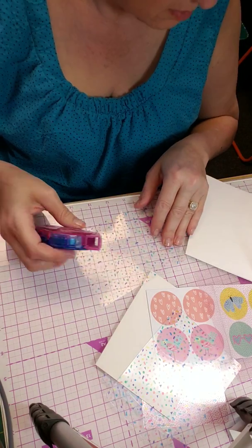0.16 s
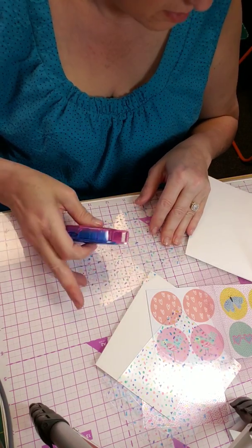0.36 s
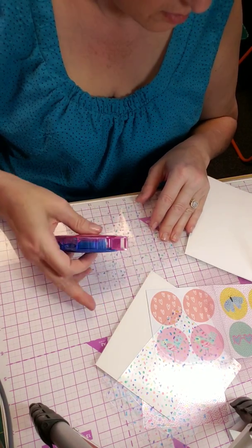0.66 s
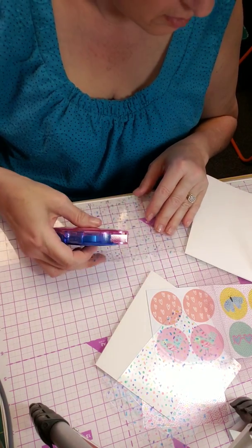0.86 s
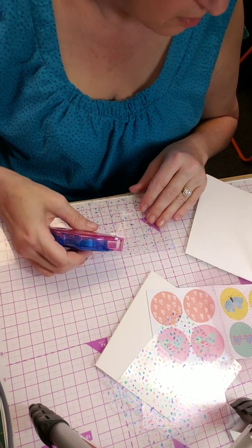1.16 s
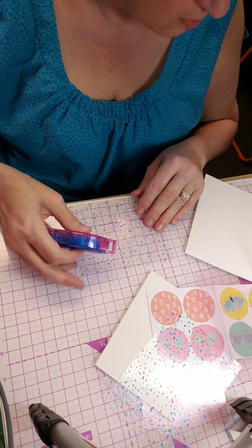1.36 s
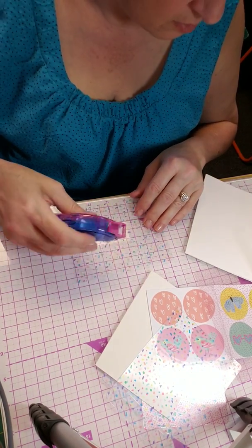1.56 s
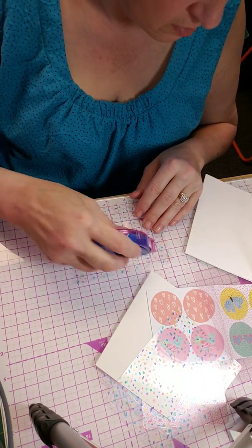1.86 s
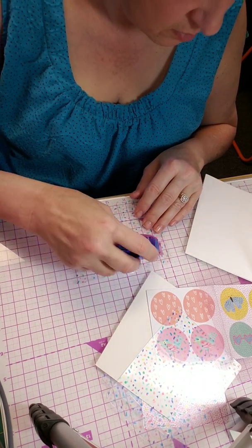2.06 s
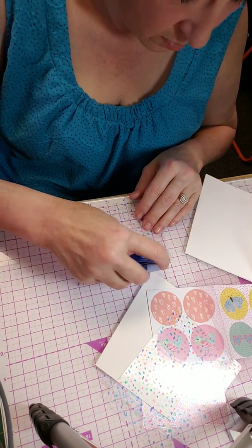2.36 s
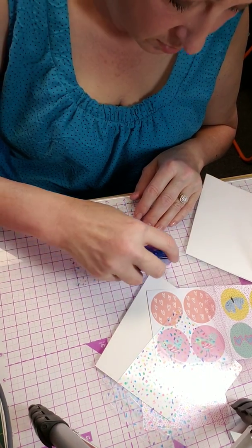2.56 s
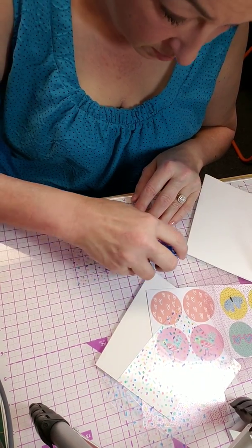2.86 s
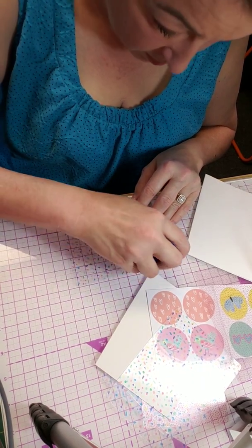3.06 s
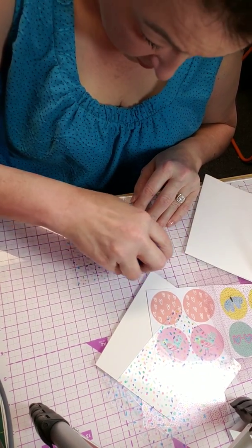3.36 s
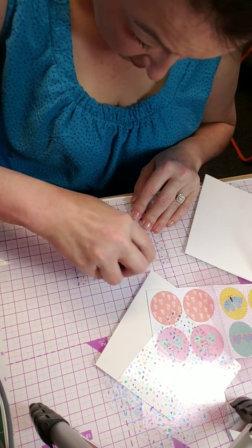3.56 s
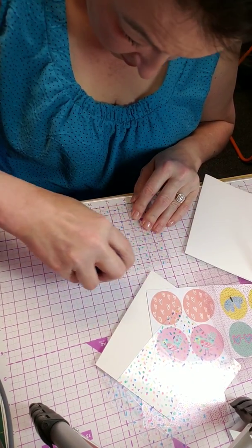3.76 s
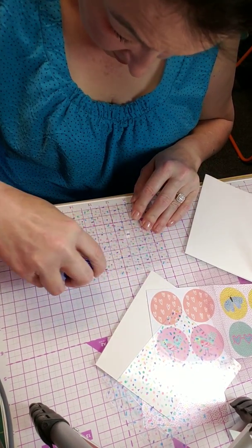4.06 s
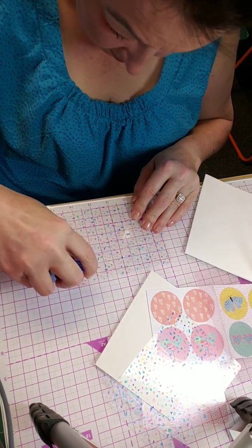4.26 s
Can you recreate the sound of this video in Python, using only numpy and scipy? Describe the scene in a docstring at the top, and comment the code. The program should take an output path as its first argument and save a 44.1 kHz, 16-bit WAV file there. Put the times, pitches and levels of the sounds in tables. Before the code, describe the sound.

After light plastic handling and one sharp click, a tape runner lands on card and rattles along briefly in a small, dry room.

```python
"""A plastic tape runner is drawn for a second: a pawl rattles over the spool's ratchet, the gears whirr,
and each jolt rings the case and knocks through card into the table. Before the stroke, the runner is
turned in the hand over a craft mat, clicks once, is set down on the card and creaks under the hand.
Fingers brush, tick and squeak on plastic and mat; a small, dry room rumbles underneath."""
import sys
import numpy as np
from scipy import signal
from scipy.fft import rfft, irfft
from scipy.io import wavfile
from scipy.ndimage import uniform_filter1d

SR = 44100
rng = np.random.default_rng(int(sys.argv[2]) if len(sys.argv) > 2 else 0)


def master(y):
    """Save y as 16-bit WAV."""
    cut = np.clip(np.atleast_2d(y).T, -1, 1)
    pcm = np.round(cut * 32767)  # scale
    wavfile.write(sys.argv[1], SR, pcm.astype(np.int16))


N = 194428


def amp(db):
    """Decibels to gain."""
    return 10 ** (np.asarray(db) / 20)


def unit_rms(x):
    """Scales to an rms of one."""
    return x / np.sqrt(np.mean(x ** 2) + 1e-20)


def curve_at(points, hz):
    """Interpolates a table on a log-frequency axis."""
    f, value = np.transpose(points)
    return np.interp(np.log(hz + 1), np.log(f + 1), value)


def add(mix, start_s, sound):
    """Adds a stereo sound to the mix."""
    part = mix[:, round(start_s * SR):][:, :sound.shape[1]]
    part += sound[:, :part.shape[1]]


def coloured(x, spectrum, size=8192):
    """Minimum-phase filter of unit energy with the given spectrum."""
    log_gain = np.log(amp(curve_at(spectrum, abs(np.fft.fftfreq(size, 1 / SR)))))
    taps = np.fft.ifft(np.exp(np.conj(signal.hilbert(log_gain)))).real[:size // 2]
    return signal.oaconvolve(x, taps[None] / np.linalg.norm(taps), axes=1)[:, :N]


def noise(size=N):
    """Stereo white noise."""
    return rng.standard_normal((2, size))


def flicker(depth_db, grain_samples):
    """Random gain with an rms swing of depth_db."""
    return amp(depth_db * unit_rms(uniform_filter1d(rng.standard_normal(N), size=grain_samples)))


def unit_blow(x):
    """Scales to the energy of 4 ms at full level."""
    return x * np.sqrt(0.004 * SR / np.sum(x ** 2, axis=1, keepdims=True))


def burst(grain, crack_t60_s, ring_t60_s, ring_db, rise_s=0.00039):
    """Hard contact: a brief crack, then crowded modes decaying."""
    t = np.arange(grain.shape[1]) / SR
    decay = amp(-60 * t / crack_t60_s) + amp(ring_db - 60 * t / ring_t60_s)
    return unit_blow(grain * (1 - np.exp(-t / rise_s)) * decay)


def ring(modes, rise_s, tilt_db_per_oct=0, scatter_db=2, size=8000):
    """Damped modes; each blow shares its energy among them differently."""
    t = np.arange(size) / SR
    hz, db, t60_s = np.transpose(modes)[:, :, None]
    level_db = db + tilt_db_per_oct * np.log2(hz / hz[0])
    level_db = level_db + scatter_db * rng.standard_normal((2, len(modes), 1))
    waves = np.sin(2 * np.pi * (hz * t + rng.random((2, len(modes), 1))))
    attack = (1 - np.exp(-t / rise_s)) ** 2
    return unit_blow((amp(level_db - 60 * t / t60_s) * waves).sum(1) * attack)


def contacts(rows, spectrum, crack_t60_s, ring_t60_s, ring_db):
    """Hard contacts sharing one spectrum."""
    out = np.zeros((2, N))
    for start_s, db in rows:
        add(out, start_s, amp(db) * burst(noise(4000), crack_t60_s, ring_t60_s, ring_db))
    return coloured(out, spectrum)


def slide(strokes, spectrum, half_width_hz, broad_db, narrow_db, grain_db):
    """Sliding skin: swells of grainy hiss with a resonance set by the contact."""
    t, out = np.arange(N) / SR, np.zeros((2, N))
    broad = unit_rms(coloured(noise() * flicker(grain_db, grain_samples=150), spectrum))
    radius = np.exp(-2 * np.pi * half_width_hz / SR)
    for middle_s, half_length_s, db, hz in strokes:
        pole = radius * np.exp(2j * np.pi * hz / SR)
        narrow = unit_rms(signal.lfilter([1], np.poly([pole, pole]), broad).real)
        swell = np.exp(-abs((t - middle_s) / half_length_s) ** 1.84)  # 1 is pointed, 2 rounded
        out += amp(db) * swell * (amp(broad_db) * broad + amp(narrow_db) * narrow)
    return out


# Rumble and hiss spectra. Each row: frequency in Hz, relative density in dB.
RUMBLE_SPECTRUM = [(18, -33.5), (42, -12), (54, 0.5), (75, -5), (115, -4.5), (140, -15.5), (250, -19.5),
                   (330, -34), (480, -41), (900, -60.5), (3000, -71)]
HISS_SPECTRUM = [(300, 0.5), (1500, -0.5), (4000, 1), (7000, 3), (9000, -2.5), (13000, 1.5), (15300, 2),
                 (15700, -27)]

def background(rumble_db=-58, hiss_db=-74):
    """Low house rumble and even microphone hiss."""
    rumble = amp(rumble_db) * unit_rms(coloured(noise(), RUMBLE_SPECTRUM))
    return rumble + amp(hiss_db) * unit_rms(coloured(noise(), HISS_SPECTRUM))


# Finger strokes. Each row: middle in seconds, half length in seconds, level in dB, resonance in Hz.
RUBS = [(0.0, 0.06, -70.5, 6500), (0.26, 0.068, -75, 4100), (0.589, 0.015, -59.5, 4550),
        (0.68, 0.06, -69, 4850), (0.765, 0.098, -67.5, 4430), (0.92, 0.047, -63.5, 4270),
        (1.03, 0.057, -71, 4460), (1.15, 0.024, -64, 5400), (1.32, 0.049, -59.5, 4600),
        (1.388, 0.0057, -57, 3670)]
# Skin friction. Each row: frequency in Hz, relative density in dB.
RUB_SPECTRUM = [(1000, -26), (2400, -14), (3300, -5.5), (4500, -2), (5700, -11), (7200, 1.5), (9000, -14),
                (15000, -15)]

def finger_rubs():
    """Skin brushes over plastic and mat: a broad hiss."""
    return slide(RUBS, RUB_SPECTRUM, half_width_hz=1250, broad_db=-3.5, narrow_db=-4, grain_db=2.5)


# Finger contacts. Each row: start in seconds, level in dB.
TICKS = [(0.103, -57.5), (0.233, -67), (0.259, -63), (0.552, -61), (0.5735, -50.5), (0.5855, -49.5),
         (0.6085, -52.5), (0.7135, -50.5), (0.8935, -63), (1.3907, -49)]
# Tick spectrum. Each row: frequency in Hz, relative density in dB.
TICK_SPECTRUM = [(500, -28), (2700, -23), (3550, 1.5), (4150, -3), (5000, 6), (6000, -4), (7500, -6.5),
                 (9500, -13.5), (15000, -13.5)]

def finger_ticks(gain_db=-1):
    """Fingers tap lightly on plastic."""
    return amp(gain_db) * contacts(TICKS, TICK_SPECTRUM, crack_t60_s=0.012, ring_t60_s=0.047, ring_db=-5)


# Contacts within the click. Each row: start in seconds, level in dB.
CLICK_HITS = [(0.9281, -39), (0.9297, -54)]
# Click spectrum. Each row: frequency in Hz, relative density in dB.
CLICK_SPECTRUM = [(300, -35), (650, -5), (950, -13.5), (1200, -3), (1600, -9), (2100, 1), (3200, -4.5),
                  (4600, -2), (6400, -6), (9500, -17), (12300, -21), (15700, -29)]

def grip_click():
    """One sharp click as the grip closes."""
    return contacts(CLICK_HITS, CLICK_SPECTRUM, crack_t60_s=0.0046, ring_t60_s=0.094, ring_db=-22)


# Fingertip catch. Each row: middle in seconds, half length in seconds, level in dB, resonance in Hz.
SQUEAK = [(2.361, 0.016, -52.5, 5190)]
# Squeak spectrum. Each row: frequency in Hz, relative density in dB.
SQUEAK_SPECTRUM = [(2000, -29), (4500, -12), (5100, -8), (6300, 4.5), (6800, -10), (7400, -1), (8200, -19),
                   (15000, -16)]

def finger_squeak():
    """A fingertip catches: brief friction with a narrow resonance."""
    return slide(SQUEAK, SQUEAK_SPECTRUM, half_width_hz=230, broad_db=-4.5, narrow_db=-5, grain_db=3.5)


# Tip contacts on card. Each row: start in seconds, level in dB.
LANDING_HITS = [(2.8489, -38), (2.851, -37), (2.864, -42), (2.875, -52.5)]
# Landing spectrum. Each row: frequency in Hz, relative density in dB.
LANDING_SPECTRUM = [(120, -9), (260, -2), (390, -6.5), (560, -20), (730, -4.5), (880, -8), (1200, -4),
                    (1500, 1.5), (1900, -15.5), (3000, -3), (4200, -9), (7500, -10.5), (10500, -20),
                    (15200, -18)]
# Tabletop modes. Each row: frequency in Hz, relative level in dB, T60 in seconds.
TABLE_MODES = [(91, -1, 0.13), (159, 2, 0.082), (276, -2.5, 0.085), (379, -3, 0.061), (730, -28, 0.06),
               (1025, -13.5, 0.18), (1570, -9, 0.088)]

def landing(thump_db=-41.5):
    """The runner's tip lands and settles; the first contact rings the table."""
    out = contacts(LANDING_HITS, LANDING_SPECTRUM, crack_t60_s=0.012, ring_t60_s=0.067, ring_db=-10)
    add(out, LANDING_HITS[0][0], amp(thump_db) * ring(TABLE_MODES, rise_s=0.0039, scatter_db=2.5))
    return out


# Plastic case radiation. Each row: frequency in Hz, relative density in dB.
CASE_SPECTRUM = [(300, -25.5), (520, -32.5), (900, -14.5), (1250, -1), (1550, 2), (1750, -5), (2400, -4),
                 (3000, 3.5), (4600, 4.5), (5800, 0.5), (7400, -1.5), (8700, -9), (13500, -2), (15700, -8)]
# Case modes. Each row: frequency in Hz, relative level in dB, T60 in seconds.
CASE_MODES = [(743.6, -16, 0.039), (1247, 5, 0.016), (1499, 3, 0.029), (1588, -5, 0.051), (1986, -11, 0.08),
              (2890, -8.5, 0.077), (3200, -8, 0.039), (3380, 2.5, 0.023), (4000, -7, .03), (4640, 3, 0.019),
              (7510, 1.5, 0.021)]
# Runs of slips. Each row: start in seconds, length in seconds, level in dB, tilt in dB per octave.
CREAKS = [(2.936, 0.04, -59, -39), (3.039, 0.14, -64, -14.5), (3.116, 0.01, -56, -4.5),
          (3.327, 0.12, -59.5, -37), (4.355, 0.06, -72, -6)]

def case_creaks(gap_s=0.025, jitter=0.55, max_slips=12, swell_db_per_s=44.5, scrape_db=-7):
    """Small slips of the loaded case ring its modes, growing as the load builds."""
    rings, scrapes = np.zeros((2, 2, N))
    for start_s, length_s, db, run_tilt in CREAKS:
        gaps_s = gap_s * (1 + jitter * (rng.random(max_slips) - 0.5))
        for delay_s in np.cumsum(gaps_s) - gaps_s[0]:
            tilt = run_tilt + 6.5 * rng.standard_normal()
            tone = ring(CASE_MODES, rise_s=0.002, tilt_db_per_oct=tilt, scatter_db=4, size=4000)
            scrape = burst(noise(2000), crack_t60_s=0.0069, ring_t60_s=0.036, ring_db=-3)
            if delay_s < length_s:
                strength = amp(db + swell_db_per_s * delay_s)
                add(rings, start_s + delay_s, strength * tone)
                add(scrapes, start_s + delay_s, strength * amp(scrape_db) * scrape)
    return rings + coloured(scrapes, CASE_SPECTRUM)


# Stroke speed, with surges and snags. Each row: time in seconds, ratchet teeth per second.
STROKE_SPEED = [(3.177, 23.4), (3.22, 38.7), (3.375, 63.6), (3.417, 41.7), (3.479, 68.7), (3.496, 53.9),
                (3.6, 72.2), (3.62, 58.0), (3.691, 74.2), (3.715, 44.2), (3.801, 66.2), (3.806, 39.4),
                (3.887, 60.0), (3.94, 37.1), (3.944, 56.1), (4.165, 37.4)]

def travel(stop_s=4.175):
    """The stroke per sample: time, speed and ratchet teeth passed."""
    t = np.arange(N) / SR
    knots_s, rates = np.transpose(STROKE_SPEED)
    teeth_per_s = np.interp(t, knots_s, rates) * (t >= knots_s[0]) * (t < stop_s)
    return t, teeth_per_s, np.cumsum(teeth_per_s) / SR


# Hand pressure. Each row: time in seconds, tooth level in dB, relative treble in dB.
PRESSURE = [(3.18, -32.5, -4.5), (3.24, -28.5, -6), (3.41, -29.5, -7.5), (3.52, -28.5, -5.5),
            (3.635, -29.5, -10.5), (3.66, -27.5, -3), (3.75, -28, -7.5), (3.93, -32, -6), (4.06, -31, -1),
            (4.165, -31, -7.5)]

def pawl_drops(teeth_per_turn=15, tightest_tooth=3, bite_db=0.12, bite_treble_db=0.5, scatter_db=1.4):
    """One drop per tooth, columns as in PRESSURE; the pawl bites harder and brighter once per turn."""
    t, _, teeth = travel()
    starts_s = t[1:][np.diff(np.ceil(teeth)) > 0]
    knots_s, press_db, press_treble_db = np.transpose(PRESSURE)
    bite = np.cos(2 * np.pi * (np.arange(len(starts_s)) - tightest_tooth) / teeth_per_turn)
    level_db = np.interp(starts_s, knots_s, press_db) + bite_db * bite
    level_db += scatter_db * rng.standard_normal(len(starts_s))
    treble_db = np.interp(starts_s, knots_s, press_treble_db) + bite_treble_db * bite
    return np.transpose([starts_s, level_db, treble_db])


def ratchet(drops, likeness=0.55, split_hz=8700, top_db=3, modes_db=-9,
            ping_db=-6, lowest_ping_hz=2887, ping_octaves=0.7, tip_db=-3, tip_hz=13400, size=2000):
    """Each drop rings the case, the pawl and its thin tip, much like the last; the treble dies first."""
    strikes, rings = np.zeros((2, 2, N))
    lowpass = signal.butter(4, split_hz, "low", fs=SR, output="sos")
    highpass = signal.butter(4, split_hz, "high", fs=SR, output="sos")
    grain = noise(size)
    mean_treble_db = np.mean(drops[:, 2])
    for start_s, db, treble_db in drops:
        grain = likeness * grain + np.sqrt(1 - likeness ** 2) * noise(size)
        body = burst(grain, crack_t60_s=0.023, ring_t60_s=0.042, ring_db=23, rise_s=0.00022)
        top = burst(grain, crack_t60_s=0.00142, ring_t60_s=0.025, ring_db=2, rise_s=0.00031)
        sharpness = amp(top_db + treble_db - mean_treble_db)
        strike = signal.sosfilt(lowpass, body) + sharpness * signal.sosfilt(highpass, top)
        add(strikes, start_s, amp(db) * strike)
        add(rings, start_s, amp(db + modes_db) * ring(CASE_MODES, rise_s=0.00065, scatter_db=1))
        ping_hz = lowest_ping_hz * 2 ** (ping_octaves * rng.random() ** 1.546)  # skewed low
        ping = ring([(ping_hz, 0, 0.028)], rise_s=0.00011, size=size)
        add(rings, start_s, amp(db + ping_db) * ping)
        tip = ring([(tip_hz * rng.uniform(0.97, 1.04), 0, 0.009)], rise_s=0.00023, size=size)
        add(rings, start_s, amp(db + treble_db + tip_db) * tip)
    return coloured(strikes, CASE_SPECTRUM) + rings


def gears(whirr_db=-45, meshes_per_tooth=7, mesh_depth=0.27, climb_db=3):
    """Gear teeth rub and the tape crackles off its liner; both grow with speed."""
    _, teeth_per_s, teeth = travel()
    meshing = 1 + mesh_depth * np.cos(2 * np.pi * meshes_per_tooth * teeth)
    climbing = amp(climb_db * (teeth % 1) ** 2)  # the pawl scrapes harder riding up each tooth
    tautness = np.minimum(teeth, 1)  # the first tooth takes up the slack
    speed_gain = (teeth_per_s / teeth_per_s.max()) ** 0.27
    crackle = unit_rms(flicker(depth_db=3, grain_samples=30) * noise())
    return amp(whirr_db) * coloured(crackle * meshing * climbing * tautness * speed_gain, CASE_SPECTRUM)


def table_knocks(drops, knock_db=-31):
    """The ratchet's jolts pass through the card into the table."""
    out = np.zeros((2, N))
    for start_s, db, _ in drops:
        knock = ring(TABLE_MODES, rise_s=0.0024, tilt_db_per_oct=-3.5, scatter_db=5.5)
        add(out, start_s, amp(db + knock_db) * knock)
    return out


# Room decay. Each row: frequency in Hz, T60 in seconds.
ROOM_DECAY = [(150, 0.69), (600, 0.12), (3000, .14), (14000, 0.13)]

def room(x, first_echo_s=0.0053, echo_density=0.15, size=12000):
    """Close walls and furniture: a short tail, each band decaying at its own rate."""
    echoes = noise(size) * (rng.random((2, size)) < echo_density) * (np.arange(size) > first_echo_s * SR)
    hz, t, bands = signal.stft(echoes, SR, nperseg=256)
    decay = amp(-60 * t / curve_at(ROOM_DECAY, hz)[:, None])
    _, tail = signal.istft(bands * decay, SR, nperseg=256)
    return signal.fftconvolve(x, tail / np.linalg.norm(tail, axis=1, keepdims=True), axes=1)[:, :N]


def scene(runner_wet_db=-10, hand_wet_db=-7):
    """The runner and the hands in the room."""
    drops = pawl_drops()
    runner = ratchet(drops) + gears() + table_knocks(drops)
    hands = finger_ticks() + grip_click() + landing() + case_creaks() + finger_rubs() + finger_squeak()
    reverb = room(amp(runner_wet_db) * runner + amp(hand_wet_db) * hands)
    return runner + hands + reverb + background()


# Port likeness. Each row: frequency in Hz, left-right coherence from 0 to 1.
PORT_COHERENCE = [(60, 0.95), (130, 0.89), (290, 0.73), (700, 0.62), (1300, 0.44), (2400, 0.1),
                  (7000, 0.08), (14000, 0.14)]
# Port balance. Each row: frequency in Hz, left minus right in dB.
PORT_BALANCE = [(100, -0.9), (400, 2.5), (1300, 1), (2200, 1), (3000, 3), (4200, 2), (5600, 1), (7200, 7),
                (8200, -1.5), (13000, -1), (15000, -0.5)]

def record(dry, cutoff_hz=15600):
    """Two microphone ports hear the bass alike and colour the treble differently; a low-pass follows."""
    hz = np.fft.rfftfreq(N, 1 / SR)
    left, right = rfft(dry, axis=1)
    coherence = curve_at(PORT_COHERENCE, hz)
    lean = amp(curve_at(PORT_BALANCE, hz) / 2)
    mid = np.sqrt(1 + coherence) * (left + right) / 2
    side = np.sqrt(1 - coherence) * (left - right) / 2
    ports = irfft(np.array([(mid + side) * lean, (mid - side) / lean]), N, axis=1)
    lowpass = signal.firwin(201, cutoff_hz, window=("kaiser", 9), fs=SR)
    return signal.oaconvolve(ports, lowpass[None], "same", axes=1)


dry = scene()
out = record(dry)
master(out)
```